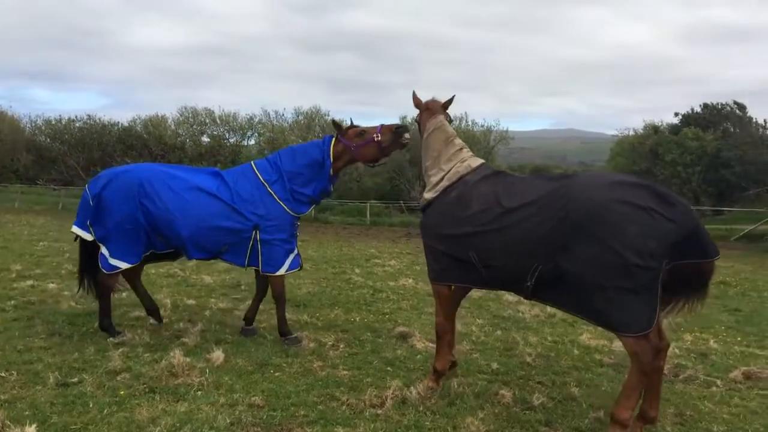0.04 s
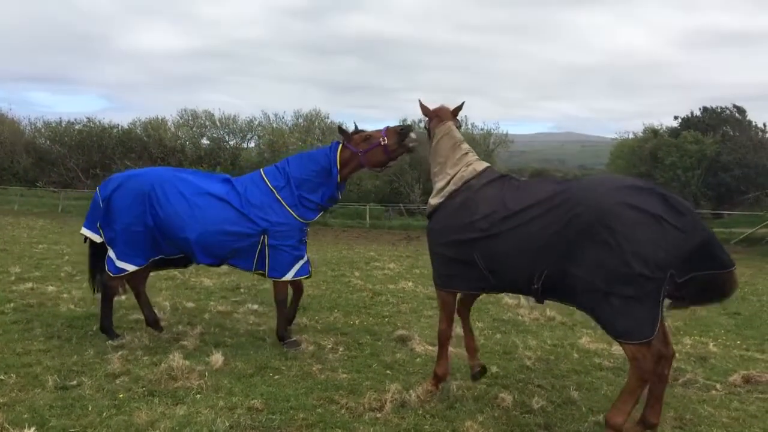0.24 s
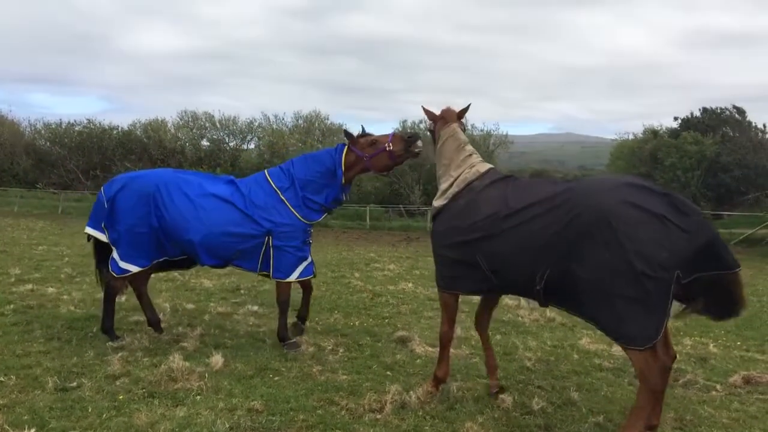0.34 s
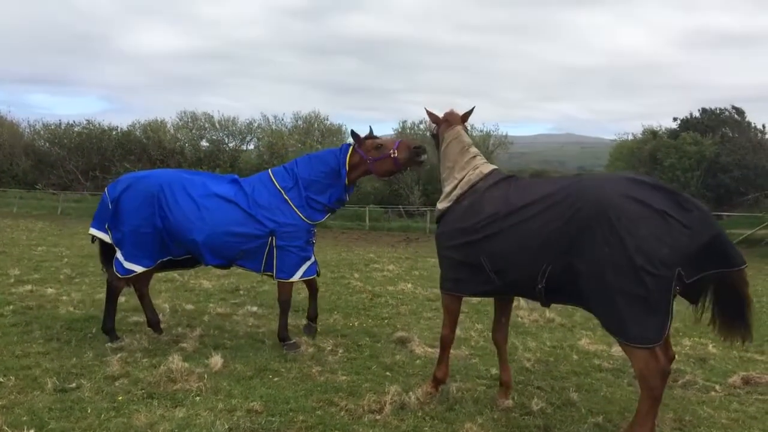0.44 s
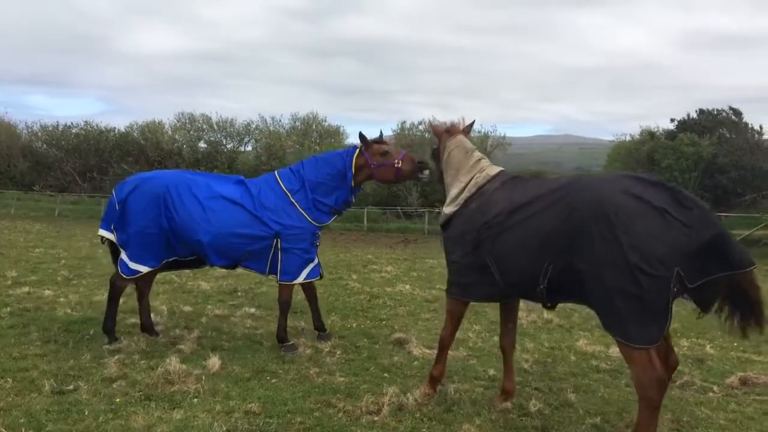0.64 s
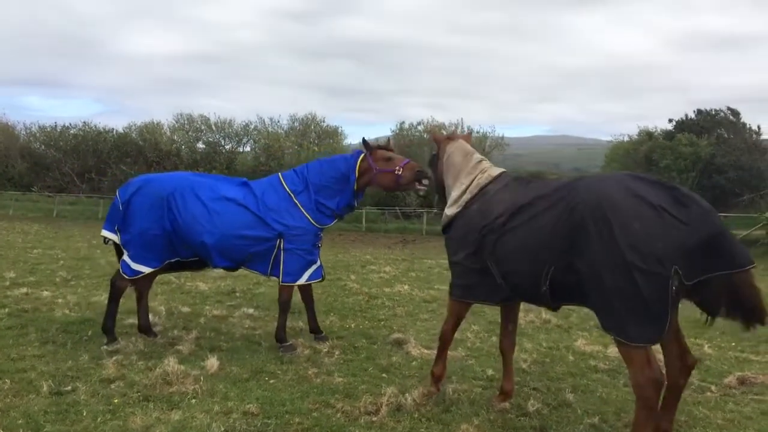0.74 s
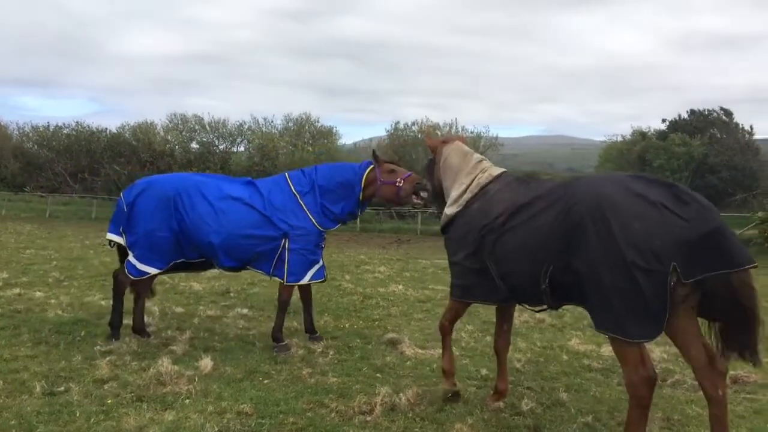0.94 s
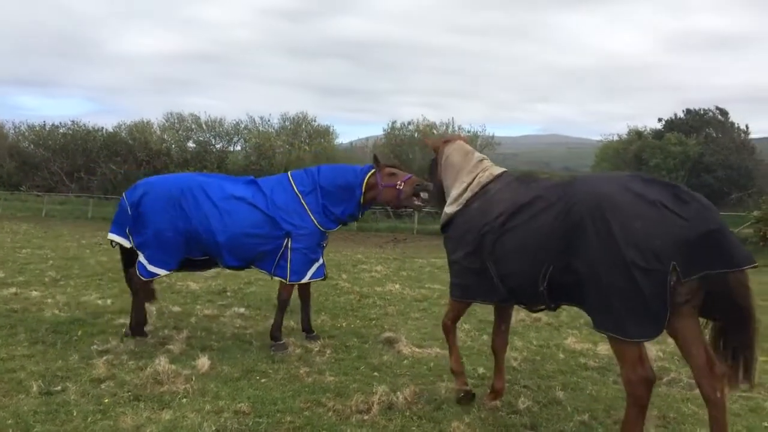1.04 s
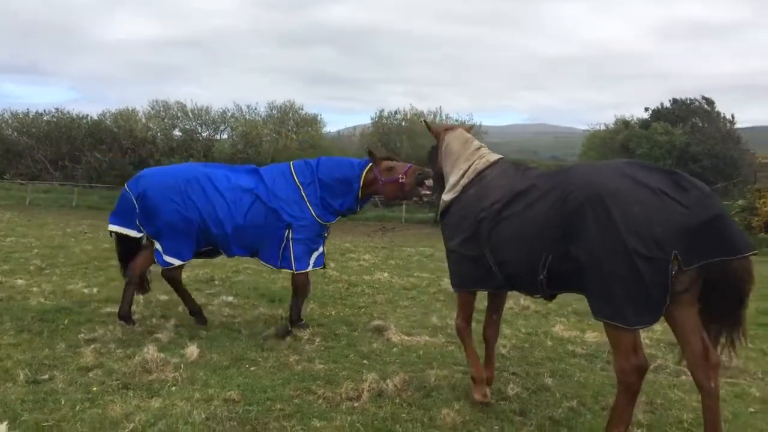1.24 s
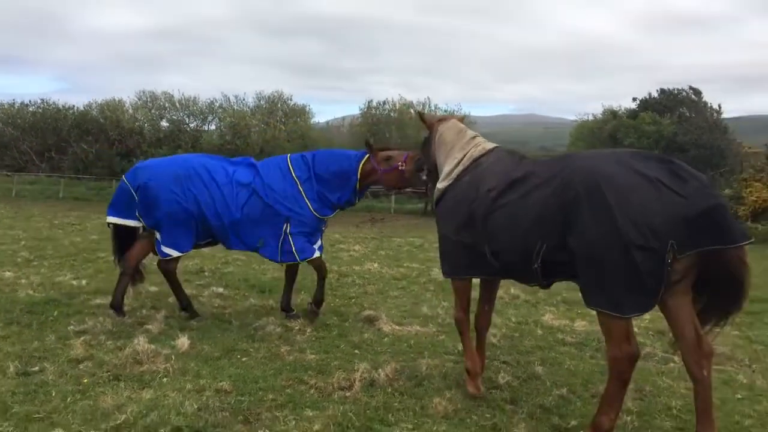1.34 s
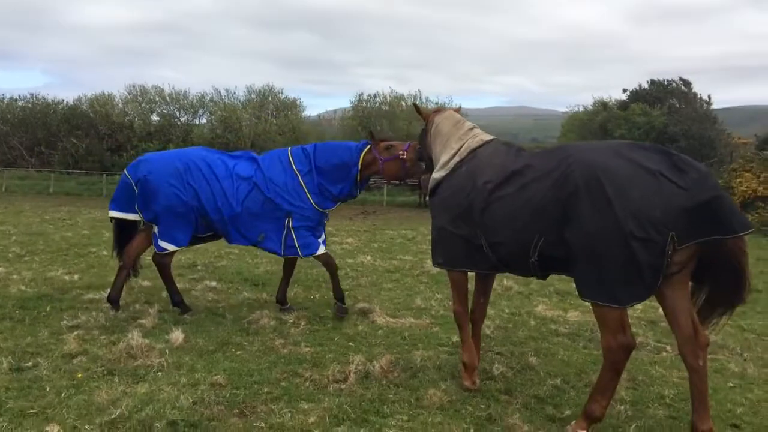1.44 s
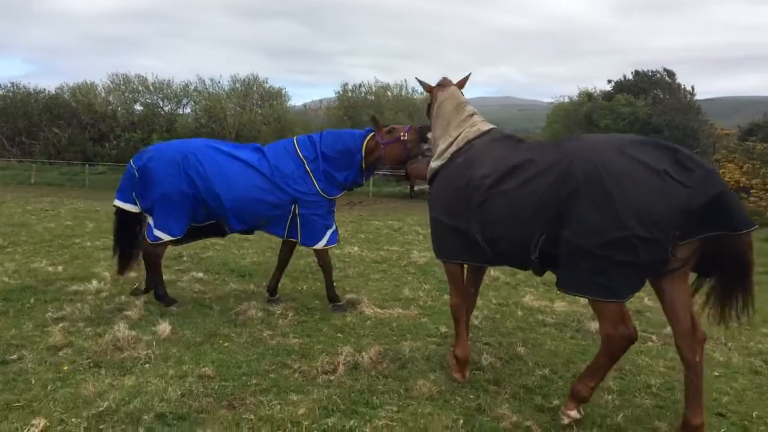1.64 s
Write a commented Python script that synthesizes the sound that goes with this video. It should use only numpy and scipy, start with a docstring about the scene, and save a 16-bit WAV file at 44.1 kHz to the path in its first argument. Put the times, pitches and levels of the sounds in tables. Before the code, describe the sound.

Wind rumbles and thumps unevenly against the microphone in a pasture, hardest about halfway through. Beneath it, two nearby horses move with faint rug rustles and small grass snaps, ending with a few soft hoof knocks on turf.

```python
"""Two horses in rugs shift about on a breezy pasture, a few metres away; their rugs swish by friction.
At first a far bird chirps once and a faint hum swells, as turbulent gusts begin to buffet the microphone
with a lumpy rumble and dull thumps. Dry grass stalks then start to snap. Just before one second the wind
hits hardest, and one rug brushes past. Last, as the gusts ease, hooves knock softly on the turf."""
import sys
import numpy as np
from scipy import signal
from scipy.io import wavfile
from scipy.ndimage import uniform_filter1d

SR = 44100
rng = np.random.default_rng(int(sys.argv[2]) if len(sys.argv) > 2 else 0)


def log_audio(samples):
    """Write samples as a 16-bit WAV file to the path given in sys.argv[1]."""
    # one column per channel
    frames = np.atleast_2d(samples).T
    # limit to full scale, then quantise
    limited = np.clip(frames, -1, 1)
    pcm = np.round(limited * 32767).astype(np.int16)
    wavfile.write(sys.argv[1], SR, pcm)


N = 74970
TIME = np.arange(N) / SR

# Spectrum of the steady air over the field: frequency_hz, relative_density_db
AIR_SPECTRUM = [(100, 1), (300, -1.5), (550, 4), (900, 1), (1800, -8), (2600, -8), (5000, -13.5),
                (15000, -25)]
# Course of the far hum: time_s, pitch_hz, level_db
HUM_CURVE = [(0, 422.6, -77), (.15, 426, -72.5), (.22, 440, -58), (.38, 444, -56.5), (.52, 439, -59.5),
             (.68, 420, -63), (.85, 417, -66.5), (1.7, 420, -83)]
# Hoof impacts on the turf: start_s, level_db, pitch_hz
HOOF_KNOCKS = [(1.325, -52.5, 1030), (1.3835, -40, 870), (1.461, -48.5, 773), (1.566, -48, 820)]
# Modes of one knock: pitch_ratio, gain_db, t60_s
HOOF_MODES = [(.78, -12, 0.031), (1, 3.5, 0.029), (1.3, -5.5, 0.015), (1.5, -7.5, 0.039), (2.28, -8, .03)]
# Breaking grass stalks: start_s, level_db, low_edge_hz, ring_gain_db
STALK_SNAPS = [(.4, -34, 4500, 2), (.54, -37.5, 4920, -14), (0.7396, -31, 520, -10),
               (.787, -37.5, 3800, -4.5), (1.004, -29, 4500, -16), (1.58, -39, 1200, -22)]
# Envelope of the rubbing of rugs and grass: time_s, level_db
SWISH_ENVELOPE = [(0, -76), (.108, -66.5), (.17, -76), (.208, -63.5), (.254, -72), (.34, -71),
                  (.388, -61.5), (.42, -66.5), (.486, -63.5), (.56, -68.5), (.62, -73), (.69, -64.5),
                  (.82, -64), (.912, -59), (.96, -62.5), (1.015, -58.5), (1.075, -65.5), (1.124, -68),
                  (1.15, -72.5), (1.24, -72), (1.355, -62), (1.4, -69), (1.53, -72.5), (1.6, -63.5),
                  (1.7, -73.5)]
# Spectrum of the friction hiss: frequency_hz, relative_density_db
SWISH_SPECTRUM = [(650, 9), (1200, 4.5), (3000, -1), (5000, -1.5), (7000, -2.5), (10000, -6), (14000, -3),
                  (16000, -4)]
# Envelope of one rug brushing past as the horses close in: time_s, level_db
BRUSH_ENVELOPE = [(.85, -72), (.95, -63), (1.03, -55.5), (1.095, -61), (1.17, -78)]
# Spectrum of the cloth at its fastest slip: frequency_hz, relative_density_db
SLIP_SPECTRUM = [(1900, 1), (4500, -2), (8000, -8.5), (15500, -18)]
# Brief flutters in hard gusts: centre_s, peak_db, pitch_hz, half_length_ms
VORTEX_FLUTTERS = [(0.265, -36, 320, 3), (0.8669, -15, 390, 2.94), (0.885, -26.5, 482.7, 2.3),
                   (0.9254, -23, 345, 2.4)]
# Single eddies that hit the microphone: centre_s, level_db, half_width_ms
EDDY_HITS = [(.162, -27, 5.2), (0.206, -25, 4.4), (0.2589, -20.5, 3.3), (.392, -16.5, 0.89),
             (0.4025, -6, 1.585), (0.595, -19, 3.63), (0.6654, -22, 2.25), (0.715, -22, 2.83),
             (0.8493, -19, 2.16), (.861, -16, 3), (0.8663, -11, 1.026), (0.878, -19, 5.2),
             (0.892, -18, 1.9), (.919, -15, 1.9), (.993, -23, 2.16), (1.03, -23.5, 3.1), (1.0708, -22, 2),
             (1.438, -32, 2.34)]
# Strength of the wind at the microphone: time_s, level_db
GUST_ENVELOPE = [(0, -51.5), (.036, -51), (.06, -55.5), (.13, -60.5), (.158, -40), (.188, -50.5),
                 (.207, -31), (.24, -43.5), (.268, -27.5), (.302, -44.5), (.38, -29), (.434, -38),
                 (.462, -36), (.51, -59), (.55, -40.5), (.59, -35.5), (.632, -30.5), (.665, -28),
                 (.72, -31.5), (.742, -49.5), (.77, -33.5), (.808, -31.5), (.828, -42), (.858, -24.5),
                 (.922, -26.5), (.966, -44), (1.003, -34), (1.032, -25), (1.078, -26.5), (1.12, -45),
                 (1.192, -55), (1.226, -41.5), (1.268, -42), (1.365, -62.5), (1.395, -39), (1.444, -41),
                 (1.53, -48.5), (1.67, -51), (1.7, -37)]
# Spectrum of the rumble in a moderate gust: frequency_hz, relative_density_db
RUMBLE_SPECTRUM = [(22, -35), (40, -18), (65, 6), (100, -1.5), (150, -7), (220, -21), (330, -30.5),
                   (600, -49.5)]


def from_db(db):
    """Logarithmic level: decibels to amplitude gain."""
    return 10 ** (np.asarray(db) / 20)


def rms_one(x):
    """Normalisation to unit rms."""
    return x / np.sqrt(np.mean(x ** 2) + 1e-20)


def in_time(rows):
    """Linear interpolation of each column of a curve at every sample."""
    times_s, *columns = np.transpose(rows)
    return [np.interp(TIME, times_s, column) for column in columns]


def at_hz(points, hz):
    """Interpolation of a spectrum on a log-frequency axis."""
    points_hz, points_db = np.transpose(points)
    return np.interp(np.log(hz), np.log(points_hz), points_db)


def butter(x, hz, kind, order=2):
    """Butterworth filter: a maximally flat passband."""
    sections = signal.butter(order, np.clip(hz, 10, .48 * SR), kind, fs=SR, output="sos")
    return signal.sosfilt(sections, x + 1e-18)


def drift(rate):
    """Low-passed noise: a slow random wander of spread 1."""
    r = np.exp(-2 * np.pi * rate / SR)
    return rms_one(signal.lfilter([1], [1, -2 * r, r * r], rng.standard_normal(N + SR))[SR:])


def ring(x, hz, t60):
    """Damped resonance: a unit click rings with height 1."""
    r, w = from_db(-60 / (t60 * SR)), 2 * np.pi * hz / SR
    return signal.lfilter([0, np.sin(w)], [1, -2 * r * np.cos(w), r * r], x + 1e-18)


def noise_bands(spectrum, count):
    """Spectral shaping: centres and bands of noise that sum to the given spectrum at rms 1."""
    edges = np.geomspace(spectrum[0][0], spectrum[-1][0], count + 1)
    centres = np.sqrt(edges[1:] * edges[:-1])
    bands = np.zeros((count, N))
    for k, hz in enumerate(centres):
        noise = butter(rng.standard_normal(N + SR // 2), edges[k:k + 2], "band", order=3)[-N:]
        bands[k] = from_db(at_hz(spectrum, hz)) * noise
    return centres, bands / bands.sum(0).std()


def noise_burst(start_s, decay_s):
    """Exponential decay: noise starts at once and dies away."""
    return rng.standard_normal(N) * (TIME >= start_s) * np.exp(-np.abs(TIME - start_s) / decay_s)


def field_air(level_db=-62.5):
    """Stationary noise: the air over the field keeps one level and spectrum."""
    _, bands = noise_bands(AIR_SPECTRUM, count=14)
    return from_db(level_db) * bands.sum(0)


def far_hum(pitch_spread=.03, level_spread_db=2.5):
    """Random frequency and amplitude modulation make a faint, distant tone waver."""
    pitch_hz, level_db = in_time(HUM_CURVE)
    phase = 2 * np.pi * np.cumsum(pitch_hz * (1 + pitch_spread * drift(25.5))) / SR
    return from_db(level_db + level_spread_db * drift(27)) * np.sqrt(2) * np.sin(phase)


def bird_chirp(centre_s=.15, length_s=.087, top_hz=3840, arch_hz=150, peak_db=-60):
    """A modulated pure tone: one thin whistle arches in pitch and level."""
    offset = np.clip(2 * (TIME - centre_s) / length_s, -1, 1)
    phase = 2 * np.pi * np.cumsum(top_hz - arch_hz * offset ** 2) / SR
    return from_db(peak_db) * (1 - offset ** 2) * np.sin(phase)


def hooves(scuff_db=-31, band_hz=(547, 2140)):
    """Impact excites damped modes: light hollow knocks, cushioned by turf, each with a short scuff."""
    knocks = np.zeros(N)
    for start_s, level_db, pitch_hz in HOOF_KNOCKS:
        scuff = from_db(scuff_db) * noise_burst(start_s, decay_s=.0077)
        contact = signal.unit_impulse(N, int(start_s * SR)) + scuff
        for k, (ratio, gain_db, t60_s) in enumerate(HOOF_MODES):
            knocks += (-1) ** k * from_db(level_db + gain_db) * ring(contact, ratio * pitch_hz, t60_s)
    return butter(knocks, band_hz, "band", order=3)


def grass_snaps(splinter_db=-24, stem_db=-4):
    """Brittle fracture: a dry stalk cracks, splinters and rings briefly; thick stems sound lower."""
    snaps = np.zeros(N)
    for start_s, level_db, low_edge_hz, ring_gain_db in STALK_SNAPS:
        crack = signal.unit_impulse(N, int(start_s * SR))
        splinters = from_db(splinter_db) * noise_burst(start_s, decay_s=.001)
        high_ring = from_db(ring_gain_db) * ring(np.diff(crack, prepend=0), hz=5040, t60=.0038)
        stem_ring = from_db(stem_db) * ring(crack, hz=2010, t60=.0016)
        snap = crack + splinters + high_ring + stem_ring
        snaps += from_db(level_db) * butter(snap, low_edge_hz, "high", order=4)
    return snaps


def rug_swish(hiss_db=2.5, flicker_db=2.06, crackle_db=-7, crackles_per_s=570, spread_db=4.5):
    """Friction noise: stiff cloth and grass rub with a fine hiss and tiny crackles."""
    level_db, = in_time(SWISH_ENVELOPE)
    _, bands = noise_bands(SWISH_SPECTRUM, count=10)
    hiss = sum(band * from_db(flicker_db * drift(29)) for band in bands)
    sizes = from_db(spread_db * np.minimum(rng.exponential(1, N), 4)) * rng.choice([-1, 1], N)
    clicks = sizes * (rng.random(N) < crackles_per_s / SR)
    crackle = rms_one(butter(clicks, hz=2500, kind="high"))
    return from_db(level_db) * (from_db(hiss_db) * hiss + from_db(crackle_db) * crackle)


def rug_brush(band_hz=(1510, 1915)):
    """Sliding friction: narrow-band noise swells and fades as one rug brushes past."""
    level_db, = in_time(BRUSH_ENVELOPE)
    return from_db(level_db) * rms_one(butter(rng.standard_normal(N), band_hz, "band"))


def rug_slip(centre_s=1.02, half_length_s=.024, level_db=-55.5, flicker_db=2):
    """Fast friction: the brushing cloth gives a short bright swish where it slips fastest."""
    swell = np.exp(-((TIME - centre_s) / half_length_s) ** 2)
    gain = from_db(level_db + flicker_db * drift(130))
    _, bands = noise_bands(SLIP_SPECTRUM, count=5)
    return gain * swell * bands.sum(0)


def wind_flutters(rise_per_half_length=.1):
    """Vortex shedding: a few quick swings of pressure that climb slightly in pitch."""
    flutters = np.zeros(N)
    for centre_s, peak_db, pitch_hz, half_length_ms in VORTEX_FLUTTERS:
        offset = np.clip((TIME - centre_s) / (half_length_ms / 1000), -5, 5)
        cycles = pitch_hz * (TIME - centre_s) * (1 + rise_per_half_length * offset / 2)
        flutters += from_db(peak_db) * np.exp(-offset ** 2) * np.cos(2 * np.pi * cycles)
    return flutters


def wind_thumps(low_hz=49, top_hz=964):
    """Each eddy is a bipolar pressure pulse, push then pull; the narrower, the harder it sounds."""
    pulses = np.zeros(N)
    for centre_s, level_db, half_width_ms in EDDY_HITS:
        offset = (TIME - centre_s) / (half_width_ms / 1000)
        swing = -offset / (1 + offset ** 2) ** 2
        pulses += from_db(level_db) * swing / swing.max()
    return butter(butter(pulses, low_hz, "high", order=1), top_hz, "low", order=6)


def wind_rumble(moderate_gust_db=-37.5, tilt_per_octave=.27):
    """Turbulent pressure on the microphone: a stronger gust is louder and reaches higher."""
    gust_db, = in_time(GUST_ENVELOPE)
    centres_hz, bands = noise_bands(RUMBLE_SPECTRUM, count=9)
    octaves = np.maximum(np.log2(centres_hz / 100), 0)[:, None]
    brightening_db = tilt_per_octave * octaves * (gust_db - moderate_gust_db)
    rumble = (bands * from_db(brightening_db)).sum(0)
    # Even out the short-term power, so that the gust envelope sets the level.
    power = uniform_filter1d(uniform_filter1d(rumble ** 2, size=900), size=900)
    return from_db(gust_db) * rumble / np.sqrt(power + 1e-12)


def scene():
    """Superposition: the open field, the horses and the wind add in one channel."""
    air = field_air()
    wind = wind_rumble() + wind_thumps() + wind_flutters()
    horses = rug_swish() + rug_brush() + rug_slip() + grass_snaps() + hooves()
    return (air + far_hum() + bird_chirp() + horses + wind)[None]


def record(dry, cutoff_hz=15500):
    """Band limiting: an elliptic low-pass filter cuts the top steeply."""
    return signal.sosfilt(signal.ellip(10, .2, 80, cutoff_hz, fs=SR, output="sos"), dry)


dry = scene()
out = record(dry)
log_audio(out)
```